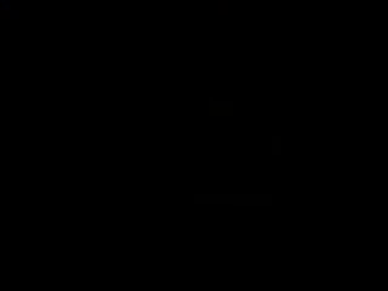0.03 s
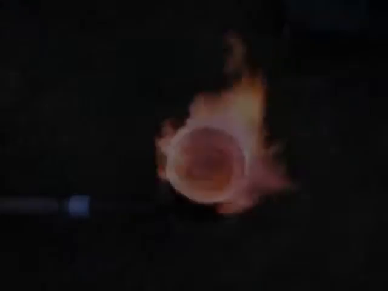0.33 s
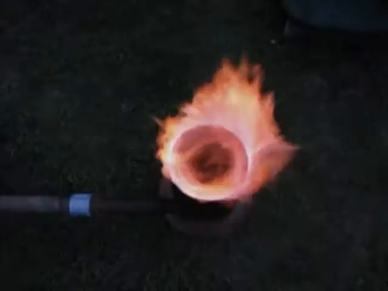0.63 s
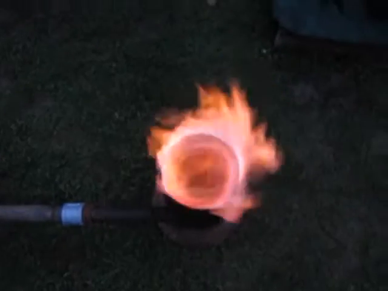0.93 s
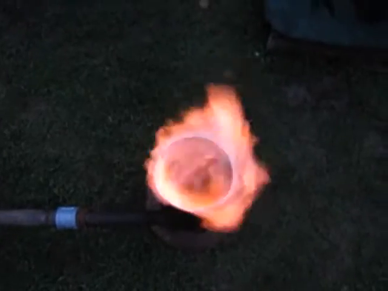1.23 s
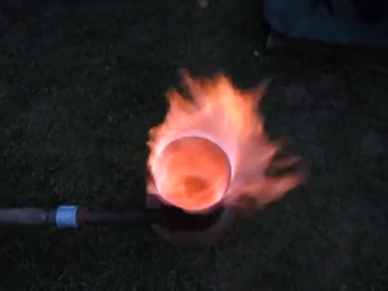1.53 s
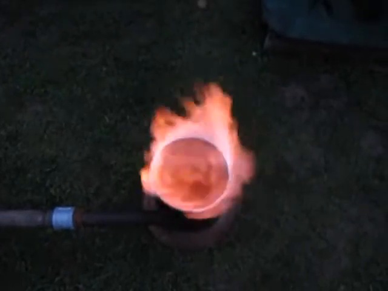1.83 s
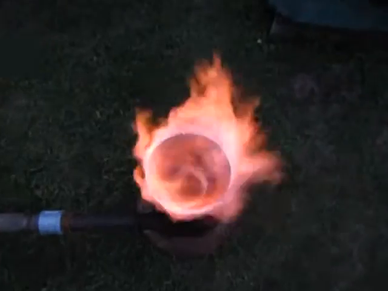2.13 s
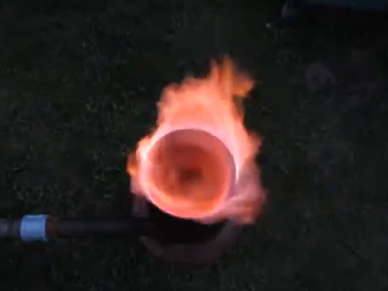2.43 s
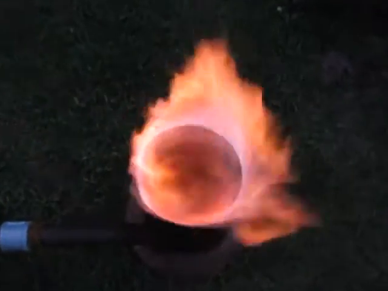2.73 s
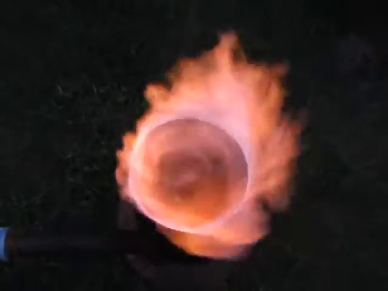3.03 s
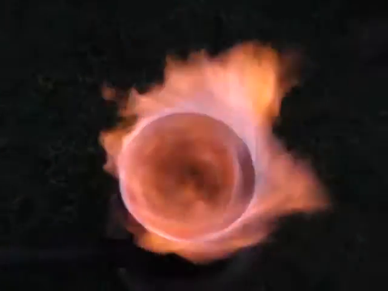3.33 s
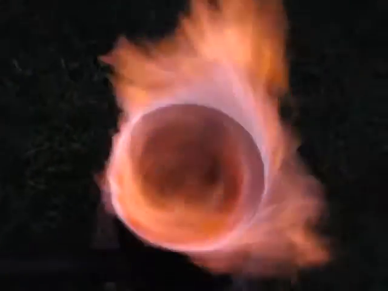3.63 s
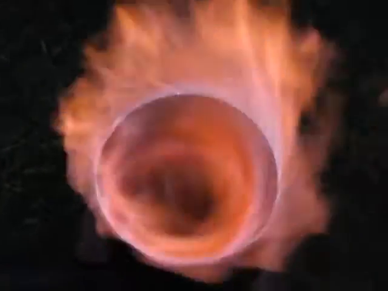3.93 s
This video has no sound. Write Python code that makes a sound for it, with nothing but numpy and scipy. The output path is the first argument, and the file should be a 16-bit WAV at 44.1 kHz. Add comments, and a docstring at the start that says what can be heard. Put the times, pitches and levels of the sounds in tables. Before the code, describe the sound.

Roaring burner flame fades in with a whining fan and faint insect chirps.

```python
"""Forced-air burner at night

Turbulent flame noise roars and rings in a steel pot, while the blower's fan sings one steady note
with overtones. An insect gives a double chirp about every 0.6 s, and faint tones swell out of the roar.
The sound starts low, fades, breaks off for a moment, and fades in again over about two seconds."""
import sys
import numpy as np
from scipy import signal
from scipy.fft import rfft, irfft
from scipy.io import wavfile
from scipy.ndimage import uniform_filter1d

SR = 44100
rng = np.random.default_rng(int(sys.argv[2]) if len(sys.argv) > 2 else 0)


def persist_wave(psi):
    """Save psi, clipped to +-1, as 16-bit WAV."""
    counts = np.round(np.clip(psi, -1, 1) * 32767).astype(np.int16)
    wavfile.write(sys.argv[1], SR, np.atleast_2d(counts).T)


N = 176400
T = np.arange(N) / SR
# The listener leans in over the mouth of the pot: BESIDE_POT goes from 1 (beside it) to 0 (over it).
LEAN_MIDPOINT_S, LEAN_LENGTH_S = 2.12, 0.55
BESIDE_POT = np.clip(.5 - (T - LEAN_MIDPOINT_S) / LEAN_LENGTH_S, 0, 1)


def amp(db):
    """Decibels to gain."""
    return 10 ** (np.asarray(db) / 20)


def unit_rms(x):
    """Scales to an rms of one."""
    return x / np.sqrt(np.mean(abs(x) ** 2) + 1e-20)


def curve(table, hz, column=1):
    """One column of a table, interpolated along log frequency."""
    columns = np.transpose(table)
    return np.interp(np.log(hz + 1), np.log(columns[0] + 1), columns[column])


def pan(db):
    """Left and right gains for a level difference; positive is to the left."""
    return amp(np.array([[.5], [-.5]]) * db)


def drift(rate_hz):
    """A smooth random wobble with an rms of one, rolling off above the given rate."""
    hz = np.fft.rfftfreq(N, 1 / SR)
    spectrum = rfft(rng.standard_normal(N)) * (hz > 0)
    return unit_rms(irfft(spectrum / (1 + (hz / rate_hz) ** 4), N))


def add(mix, start_s, sound):
    """Mixes a sound in at its start time."""
    part = mix[round(start_s * SR):][:len(sound)]
    part += sound[:len(part)]


def turbulence(patch_db=0.97):
    """Spectra of two independent noises that share drifting louder and softer patches."""
    frames, bins = N // 256 + 5, 513
    a, b, c, d, patches = rng.standard_normal((5, frames, bins))
    patches = uniform_filter1d(patches, size=12, axis=0)  # smooth in time
    patches = uniform_filter1d(patches, size=10, axis=1)  # and in frequency
    grains = np.array([a + 1j * b, c + 1j * d]) * amp(patch_db * unit_rms(patches))
    _, noise = signal.istft(grains.transpose(0, 2, 1), nperseg=1024, noverlap=768)
    return rfft(noise[:, :N])


# The broad tone of the flame. Each row: frequency in Hz, relative level in dB.
FLAME_SPECTRUM = [(20, -23.5), (40, -16), (65, -8), (140, -8.5), (230, -10.5), (300, -4.5), (600, 0.5),
                  (760, 0), (1050, -9.5), (1220, -13), (1480, -9), (1800, -15), (2820, -10.5),
                  (3100, -20.5), (3800, -16.5), (4800, -20.5), (5900, -23.5), (6500, -34), (7300, -34)]
# Resonances of the pot and the air pipe. Each row: centre in Hz, width in Hz, boost in dB.
POT_RESONANCES = [(189.5, 27, 3.5), (293, 23, 2), (357, 61, 2), (488, 47, 5.5), (643, 24, 5.5),
                  (699, 50, 5.5), (877, 50, 5), (1005, 55, 4.5), (1121, 70, 8), (1343, 49, 8.5),
                  (1501, 50, 7.5), (1690, 55, 3.5), (1940, 67, 3), (2173, 150, 4), (2536, 46, 4),
                  (2740, 120, 3), (5280, 240, 3)]
# Troughs between the resonances. Each row: centre in Hz, width in Hz, gain in dB.
POT_TROUGHS = [(562, 29, -2.5), (783, 70, -3), (1040, 35, -1.5)]
# The flame's stereo image. Each row: frequency in Hz, left-right likeness from 0 to 1,
# left over right in dB, left phase lead in radians.
FLAME_STEREO = [(150, 1, -1, 0), (500, 0.99, 1.16, -0.081), (1000, 0.94, 1, -0.14), (1500, 0.75, 0, -.15),
                (2010, 0.81, -4, -0.37), (2500, .72, -6, -0.17), (2960, 0.52, -2.5, .3),
                (3320, 0.92, 7, -0.037), (3900, 0.36, 0.5, 0), (4700, 0.11, 1.2, 0), (5800, 0.27, 0, -.2),
                (6500, 0.94, 0, 0)]
# The flame's added colour from beside the pot. Each row: frequency in Hz, gain in dB.
BESIDE_POT_EQ = [(60, -1), (230, -0.5), (500, 0), (1100, 0.5), (2600, -0.5), (3600, 1), (6000, 0.5)]


def flame(level_db=-28, swell_db=0.33, flutter_db=0.6):
    """Turbulent noise, coloured by the pot, fluttering as the flame licks."""
    left, independent = turbulence()
    hz = np.fft.rfftfreq(N, 1 / SR)
    likeness, pan_db, left_lead = (curve(FLAME_STEREO, hz, column) for column in (1, 2, 3))
    right = likeness * left + np.sqrt(1 - likeness ** 2) * independent
    right *= np.exp(-1j * left_lead)
    colour_db = curve(FLAME_SPECTRUM, hz)
    for centre, width, db in POT_RESONANCES + POT_TROUGHS:
        colour_db += db * .5 ** ((2 * (hz - centre) / width) ** 2)
    above = np.array([left, right]) * amp(colour_db) * pan(pan_db)
    beside = above * amp(curve(BESIDE_POT_EQ, hz))
    roar = (1 - BESIDE_POT) * irfft(above, N) + BESIDE_POT * irfft(beside, N)
    licking_db = swell_db * drift(rate_hz=1.5) + flutter_db * drift(rate_hz=25)
    return unit_rms(roar) * amp(level_db + licking_db)


# The harmonics of the fan's note. Each row: harmonic number, base level in dB, left over right in dB,
# left phase lead in radians, waver depth in dB.
FAN_HARMONICS = [(1, -27, 1.36, -.1, -0.5), (2, -32.5, -3, -.2, 0.35), (3, -34, -6, -.65, 1.2),
                 (4, -52, -2.5, 0.27, 3), (5, -46, 2.5, -0.09, .5), (8, -59, 10.5, .2, 2),
                 (9, -70.5, -3.5, 0, 3.5)]
# The third harmonic sways and drops out for a moment. Each row: time in seconds, gain in dB.
THIRD_HARMONIC_RIDE = [(0, -3.5), (.45, 2.5), (.78, 0), (1.17, 3), (1.32, -1.5), (1.5, 2.5), (1.55, -18),
                       (1.6, 3), (1.66, -27), (1.81, -24), (1.87, -6), (2.06, -1.5), (2.13, 1), (2.4, -1.5),
                       (2.68, -3), (2.78, 1), (3.13, -.5), (3.27, 1), (3.72, -1.5), (3.9, 3.5), (4, -6.5)]
# The fifth harmonic sways. Each row: time in seconds, gain in dB.
FIFTH_HARMONIC_RIDE = [(0, -0.5), (.68, 1.5), (1.1, 3.5), (1.25, -0.5), (1.68, 4.5), (1.8, 1), (1.97, 4),
                       (2.15, -1.5), (2.32, -2.5), (2.48, 4), (2.7, -3.5), (2.9, 3), (3.03, -3.5),
                       (3.17, 3), (3.33, -1), (3.65, 0), (3.8, 2), (4, -1)]


def blower(blade_hz=701.54, wander_hz=.2, jitter_hz=0.46, second_beside_db=1):
    """The fan's blade note: nearly constant speed, each harmonic wavering in the hot air."""
    pitch_hz = blade_hz + wander_hz * drift(rate_hz=4.3) + jitter_hz * drift(rate_hz=50)
    blade_phase = 2 * np.pi * np.cumsum(pitch_hz) / SR
    ride_db = {
        2: second_beside_db * BESIDE_POT,
        3: np.interp(T, *np.transpose(THIRD_HARMONIC_RIDE)),
        5: np.interp(T, *np.transpose(FIFTH_HARMONIC_RIDE)),
    }
    out = np.zeros((2, N))
    for harmonic, db, pan_db, left_lead, waver_db in FAN_HARMONICS:
        level_db = db + waver_db * drift(rate_hz=7.8) + ride_db.get(harmonic, 0)
        phase = harmonic * blade_phase + 2 * np.pi * rng.random() - np.array([[0], [left_lead]])
        out += np.sqrt(2) * amp(level_db) * pan(pan_db) * np.sin(phase)
    return out


# The insect's calls. Each row: start in seconds, base level in dB.
INSECT_CALLS = [(0.759, -39.5), (1.428, -37), (2.019, -37), (2.629, -39.5), (3.284, -39.5), (3.779, -38.5)]
# The wing pulses of one call: a soft lead-in, then two high-low pairs.
# Each row: offset in seconds, pitch in Hz, gain in dB.
WING_PULSES = [(-.034, 4170, -6.5), (0, 4400, -4.5), (0.013, 4220, -3.5), (0.044, 4420, -0.5),
               (0.059, 4260, -4.5)]


def insect(pulse_s=0.017, fall_hz=130, rasp_hz=121.6, rasp_depth=0.27, echo_s=0.011, echo_db=-10):
    """Short raspy wing pulses, each falling in pitch, from the right, with one reflection off the yard."""
    chirps, t = np.zeros(N), np.arange(0, pulse_s, 1 / SR)
    progress = t / pulse_s
    rasp = 1 + rasp_depth * (drift(rasp_hz) + 1j * drift(rasp_hz))  # roughens level and phase
    for start, call_db in INSECT_CALLS:
        for offset, hz, pulse_db in WING_PULSES:
            onset = start + offset
            glide_hz = hz + fall_hz * (.5 - progress)
            pulse = np.exp(2j * np.pi * np.cumsum(glide_hz) / SR) * np.sin(np.pi * progress)
            pulse *= rasp[round(onset * SR):][:len(t)]
            add(chirps, onset, np.sqrt(2) * amp(call_db + pulse_db) * pulse.real)
    left = np.interp(T - 45e-6, T, chirps)  # reaches the left ear 45 microseconds late
    direct = np.array([left, chirps]) * pan(db=-5.5)
    echo = amp(echo_db) * np.interp(T - echo_s, T, chirps)
    return direct + echo * np.array([[1], [.5]])  # the echo leans left


# Brief, faint ringing tones. Each row: centre in seconds, length in seconds, pitch in Hz, level in dB.
RINGING_TONES = [(1.076, .08, 1700, -43), (1.308, .07, 1710, -45), (2.02, .07, 2550, -38.5),
                 (2.823, .06, 1690, -40), (3.147, 0.14, 1690, -46), (3.351, 0.096, 1685, -37.5)]


def ringing(pan_db=-2):
    """Soft, short sine tones that swell out of the roar and sink back."""
    out = np.zeros(N)
    for centre, length, hz, db in RINGING_TONES:
        t = np.arange(0, length, 1 / SR)
        swell = np.sqrt(2) * amp(db) * np.sin(np.pi * t / length)
        add(out, centre - length / 2, swell * np.sin(2 * np.pi * hz * t))
    return out * pan(pan_db)


def scene():
    """Burner, blower and the night around them."""
    return flame() + blower() + insect() + ringing()


def record(dry):
    """A quiet fade out, a short break and a long fade in, with the top end cut off."""
    fade_out_s, break_s, resume_s = 0.16, 0.137, .2005
    fade_in_start_s, fade_in_s = 0.18, 2.223
    fade_out = amp(db=-22) * np.clip(1 - T / fade_out_s, 0, 1) * (T < break_s)
    fade_in = np.clip((T - fade_in_start_s) / fade_in_s, 0, 1) ** 0.92 * (T > resume_s)
    fader = uniform_filter1d(fade_out + fade_in, size=24)  # softens the edges of the break
    lowpass = signal.firwin(511, cutoff=7400, window=("kaiser", 9), fs=SR)
    return signal.oaconvolve(dry * fader, lowpass[None], "same")


dry = scene()
out = record(dry)
persist_wave(out)
```